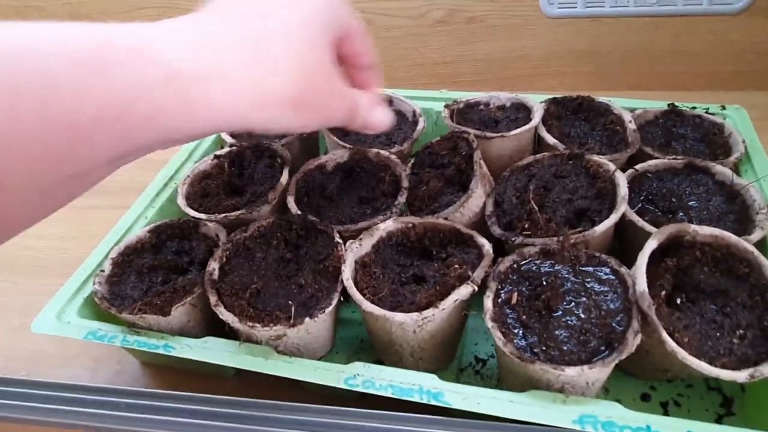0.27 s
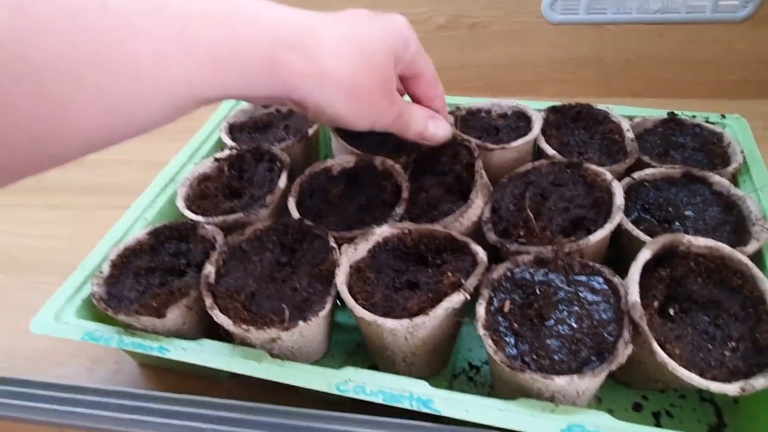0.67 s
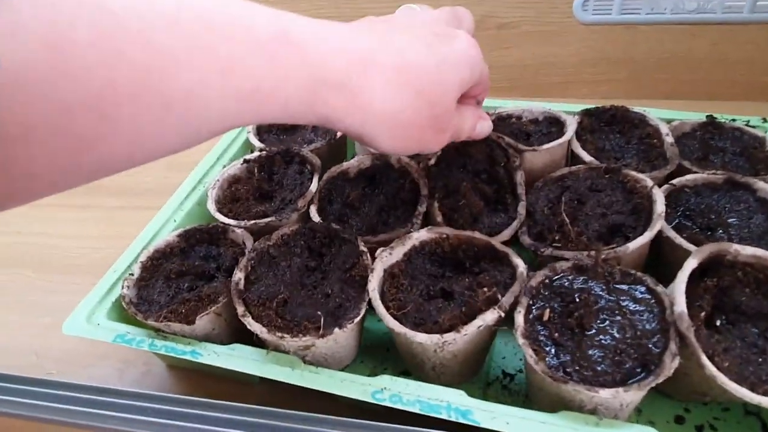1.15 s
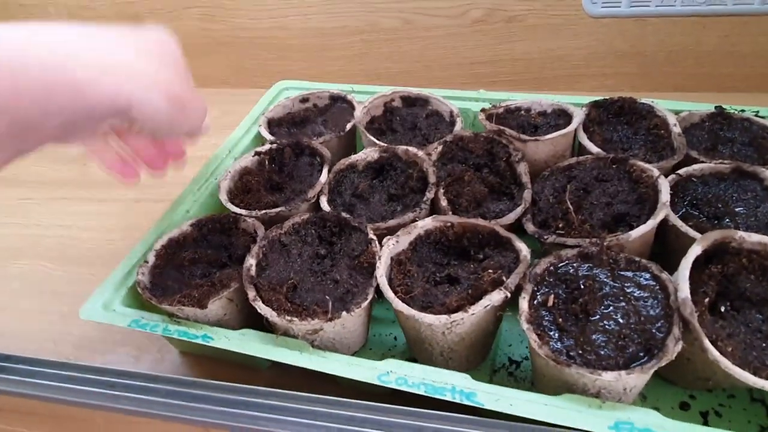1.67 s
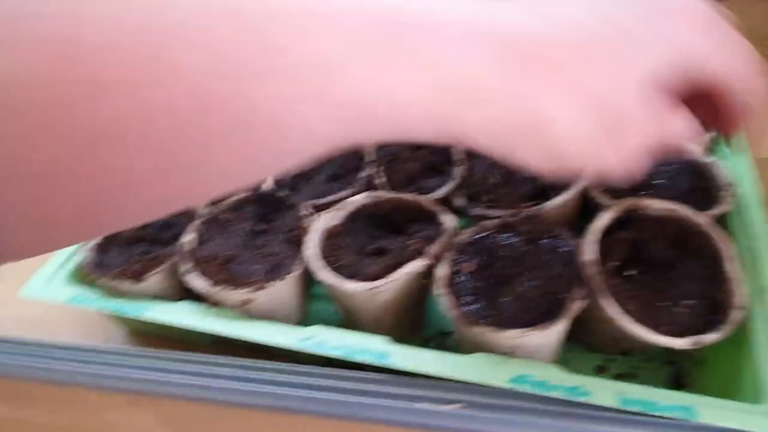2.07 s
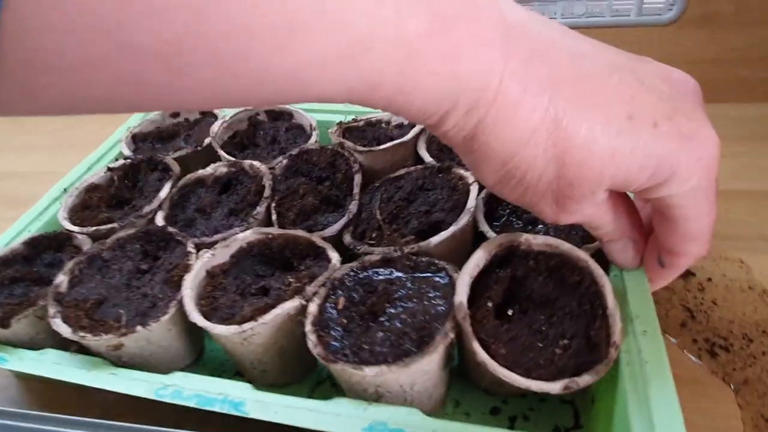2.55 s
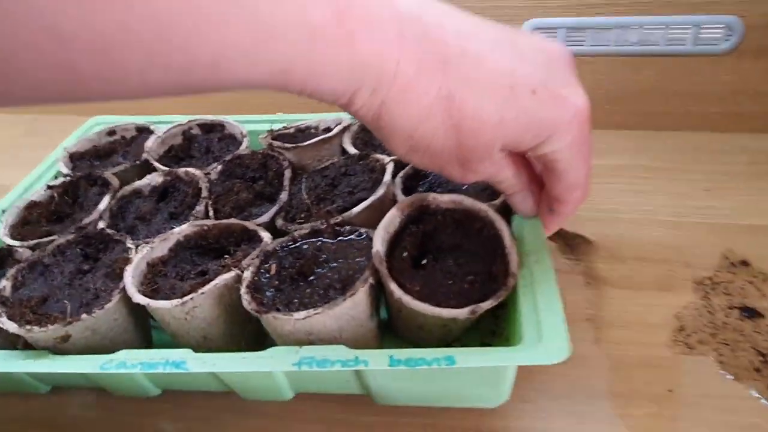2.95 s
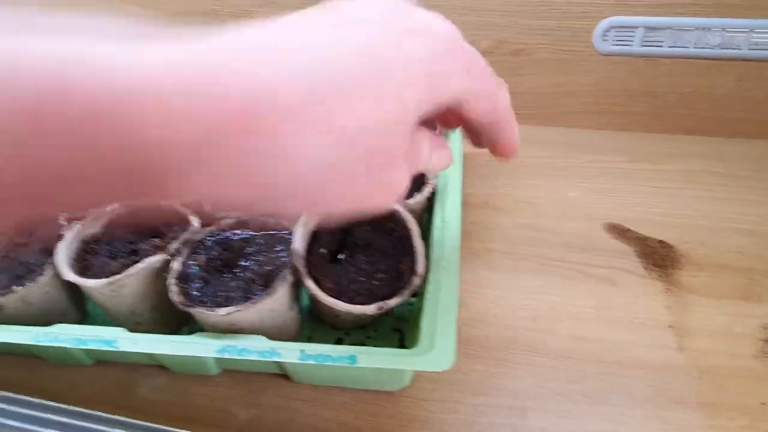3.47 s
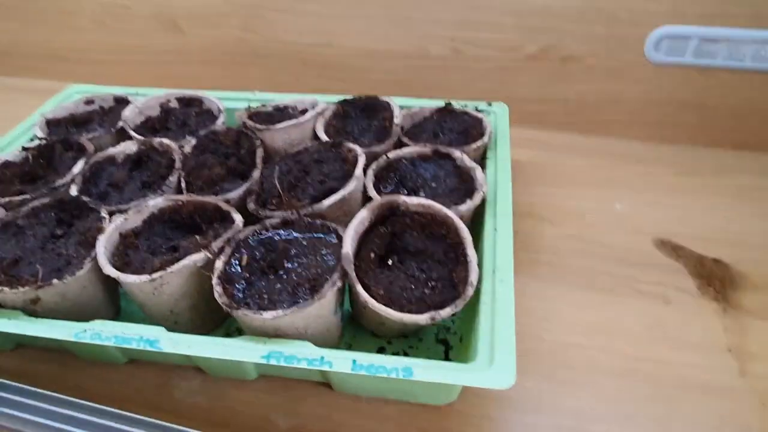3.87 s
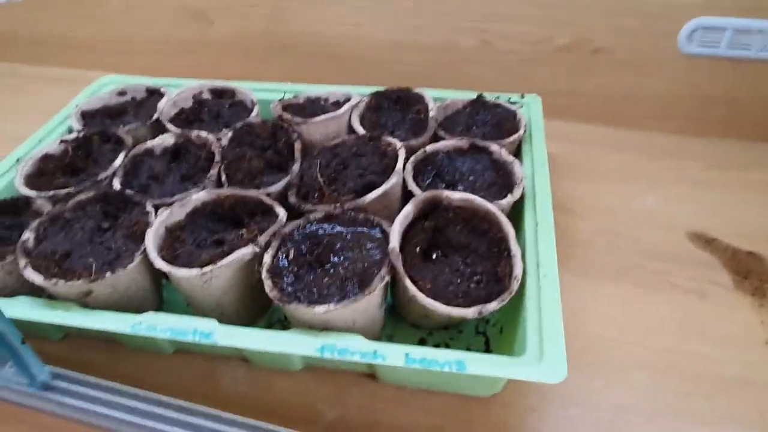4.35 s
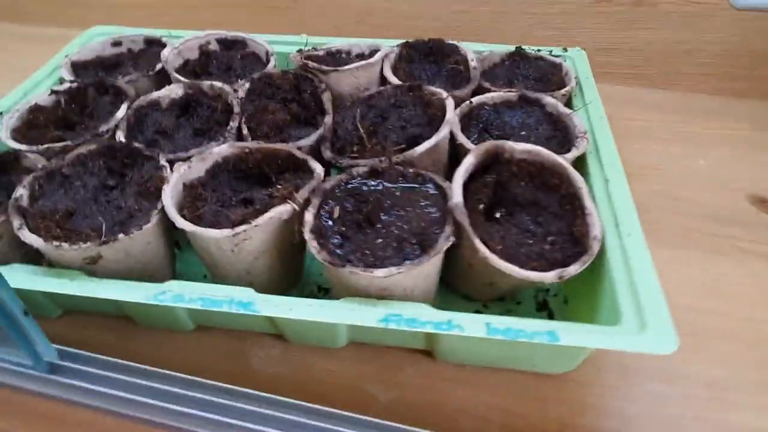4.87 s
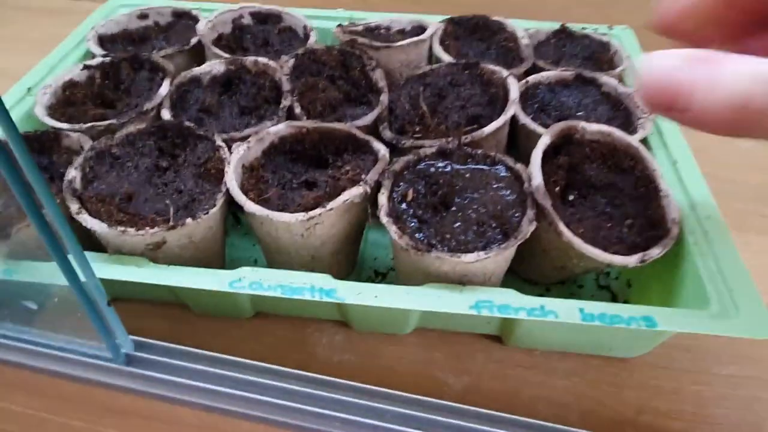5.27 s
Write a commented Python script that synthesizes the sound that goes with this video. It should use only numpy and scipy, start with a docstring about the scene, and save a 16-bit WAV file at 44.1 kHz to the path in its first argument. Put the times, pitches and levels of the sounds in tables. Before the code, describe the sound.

Quiet room with faint rumble and hum, recorded close in stereo. Irregular moist crunches come first, then two dull nudges on a tray, a creak and a rough gritty plastic-on-wood drag that strengthens and ends in a cluster of woody thumps. A calm gap follows, then muffled finger knocks and rubbing on the recorder at right, with distant bird chirps.

```python
"""Soft wet crunches over a faint room hum: a hand presses compost into paper pots. Then the plastic
seed tray is dragged over a gritty wooden shelf until it bumps to a stop. Fingers rub and knock the
hand-held recorder by its right port; its casing ticks; a sparrow chirps outside.
Contacts are random grains through stereo spectra; panels, board, pots and casing are ringing modes;
birds are gliding sines with echoes; the room is filtered noise and wavering hum lines."""
import sys
import numpy as np
from scipy import signal
from scipy.fft import rfft, irfft, next_fast_len
from scipy.io import wavfile

SR = 44100
rng = np.random.default_rng(int(sys.argv[2]) if len(sys.argv) > 2 else 0)


def transcribe(u):
    """Save the signal u as a 16-bit wav file named by the first command-line argument.

    u: samples, shape (n,) or (channels, n), limited to [-1, 1]; the rate is SR.
    q: integer samples, one column per channel.
    """
    v = np.clip(np.atleast_2d(u).T, -1, 1)
    q = np.round(v * 32767).astype(np.int16)
    wavfile.write(sys.argv[1], SR, q)


N = 242934
FFT = next_fast_len(N)
TIME = np.arange(N) / SR
HZ = np.maximum(np.fft.rfftfreq(FFT, 1 / SR), 1)

# Stereo: (frequency [Hz], left-right likeness)
LIKENESS = [(60, 0.76), (250, 0.66), (2000, 0.33), (5000, 0.051)]
# (frequency [Hz], left's phase lead [rad])
PHASE_LEAD = [(150, .2), (1500, 1.7)]
# Balance of rubbed contacts: (frequency [Hz], left-right [dB])
PORT_BALANCE = [(800, -1.5), (9000, -3.5), (14000, -16.5)]

# Relative spectra: (frequency [Hz], density [dB per Hz])
# room air
ROOM_SPECTRUM = [(40, -3.5), (75, 0.5), (125, -9), (230, -17), (341, -6.5), (420, -13), (970, -26.5),
                 (3230, -34), (7650, -46), (10200, -38), (15500, -43)]
# rub of skin on the casing
RUB_SPECTRUM = [(240, -14), (400, 9), (871, 1), (2010, -3.5), (4180, -13.5), (7000, -37), (9100, -83)]
# handling rumble
HANDLING_SPECTRUM = [(70, 2.5), (200, -6.5), (450, -21), (900, -74)]
# treble of fingers and skin
SOFT_GRIT_SPECTRUM = [(6500, -51), (8300, -2.5), (9800, 6.5), (11500, -1.5), (15500, -24)]
# body of the compost crunch
RUSTLE_SPECTRUM = [(290, -32), (500, -1.5), (804, -11.5), (1250, -2.5), (1440, -9), (2900, -15),
                   (7000, -34), (9100, -88)]
# body of the scrape
SCRAPE_SPECTRUM = [(820, -32), (1400, -4.5), (3140, -4.5), (7000, -17.5), (9100, -47)]
# treble of the scrape
GRIT_SPECTRUM = [(4710, -47.5), (8000, -15.5), (8360, -2), (9870, 4.5), (11500, -0.5), (15500, -13.5)]
# load of wet pots pressing on the wood
WEIGHT_SPECTRUM = [(150, -33), (250, -8.5), (423, -8.5), (598, 2), (804, -7), (949, 2), (1400, -8.5),
                   (1820, -34.5), (3080, -120)]

# Distant rumble and deep drone: (time [s], rumble level [dB], drone level [dB])
SWELL = [(0, -67, -85), (.42, -71.5, -77), (.52, -68.5, -71), (1.15, -62.5, -68), (2.0, -63, -64.5),
         (5.51, -64, -69)]
# Hum lines: (frequency [Hz], level [dB])
HUM = [(102.3, -71), (150.7, -81.5), (349.9, -83.5), (549.1, -85.5)]

# One call: two-voiced pip, faint slide, loud note, falling end; times before stretching
# (time after start [s], length [s], from [Hz], to [Hz], relative level [dB])
CHIRP_NOTES = [(.003, .022, 4520, 4400, 0), (.003, .024, 4120, 3980, 1), (.014, .03, 3650, 2900, -5),
               (.04, .04, 3600, 3150, 8), (.052, .028, 3200, 2800, 1)]
# Calls: (start [s], level [dB], time stretch [ratio])
CHIRPS = [(1.434, -64.5, 0.97), (3.83, -65, 0.91), (4.872, -59, 0.77)]
# Far song, and the faint first note of the second chirp:
# (start [s], length [s], from [Hz], to [Hz], level [dB])
FAINT_NOTES = [(3.806, .025, 4950, 4520, -80), (4.93, 0.25, 4450, 4290, -74.5), (5.0, .33, 3555, 3310, -80)]

# Casing ticks: (time [s], peak [dB], left-right [dB], tilt [dB per octave])
TICKS = [(3.9896, -41, 10.5, -6), (4.784, -42, -14, -15)]
# Casing modes: (frequency [Hz], relative level [dB], t60 [s])
CASING_MODES = [(583, 4, 0.012), (1090, -13, 0.027), (2220, 16.5, 0.0014), (3200, 3.5, 0.022)]
# Finger knocks by the right port: (time [s], push level [dB], contact scale [ms], scuff level [dB])
KNOCKS = [(4.327, -24, 3.06, -61), (4.376, -24, 2.84, -64.5), (4.456, -24, 2.68, -64.5),
          (4.537, -22.5, 2.45, -54), (4.58, -41, 2.3, -59.5), (4.712, -27.5, 4.5, -71),
          (4.805, -26.5, 4.1, -81), (4.855, -34.5, 2.74, -76)]
# Hand strokes on the recorder: (start [s], length [s], rub level [dB], brightness [dB],
# rumble level [dB], left-right [dB] of the rub)
STROKES = [(3.973, 0.29, -68, -23.5, -55, 4.5), (4.07, 0.021, -86, 7, -70, 0),
           (4.276, 0.33, -82, -10.5, -56, -6), (4.388, 0.34, -70, -8.5, -55.5, 2),
           (4.545, 0.58, -62, -28.5, -54, -5), (4.957, 0.073, -62, -21.5, -68, -21.5)]
# Skin dragged across the right port: (start [s], length [s], frequency [Hz], level [dB])
RASPS = [(4.1, .07, 2000, -75), (4.66, .12, 2150, -75), (4.976, .044, 1500, -56)]

# Board modes: (frequency [Hz], relative level [dB], unloaded t60 [s])
SHELF_MODES = [(82.5, 0, 0.015), (101.2, -3.5, 0.31), (148, -3.5, 0.15), (206.3, 2.5, 0.11),
               (329, -8, 0.147)]
SHELF_LEAN_DB = [-11.0, 1.5, -2.5, -1.5, -13.5]  # left-right, one per board mode
# Shelf jolts: (time [s], rumble level [dB])
JOLTS = [(1.88, -51), (2.279, -45), (3.031, -40.5)]
# Tray bumps: (time [s], strike level [dB], contact [ms])
BUMPS = [(1.837, -38.5, 7.1), (1.904, -34, 6.4), (2.299, -37.5, 1.5), (2.426, -38.5, 7.3),
         (3.481, -26, 2.23), (3.4852, -23.5, 5.87), (3.4969, -23, 3.36), (3.522, -31, 3.43)]

# Presses into compost and on the tray rim:
# (start [s], start to decay [s], level before offset [dB], brightness [dB], hollow pitch [Hz])
PRESSES = [(0.085, 0.06, -57.5, -7.5, 1600), (0.208, 0.018, -61.5, 0, 1190),
           (0.27, 0.0086, -73.5, -21, 2500), (0.485, 0.047, -64, -15, 1190), (0.578, 0.058, -58, -15, 1050),
           (0.648, 0.02, -53.5, -12, 1190), (0.85, .01, -63, 1, 1860), (0.967, 0.11, -61.5, -7, 1236),
           (1.108, 0.033, -57, -6.5, 985), (1.255, 0.062, -59.5, -8.5, 1200),
           (1.365, 0.077, -65.5, -10.5, 1120), (1.826, 0.026, -51, -16.5, 860),
           (1.874, 0.022, -49.5, -12.5, 1000)]
# Pot modes: (multiple of the hollow pitch)
POT_MODES = [1, 1.56, 2.4]

# Tray creeps, slides, stops: (time [s], scrape level [dB], brightness [dB])
DRAG = [(2.34, -70.5, -4), (2.506, -68.5, 0.5), (2.57, -53.5, -3.5), (2.638, -49.5, -1.5),
        (2.874, -45, 3.5), (3.005, -42, 2.5), (3.07, -37.5, -1), (3.19, -41, -4), (3.284, -40.5, -1),
        (3.394, -38, -2), (3.45, -43.5, -4.5), (3.48, -39.5, -4.5), (3.51, -58.5, -5.5)]
# Tray panel modes: (frequency [Hz])
TRAY_MODES_HZ = [612, 681, 944, 1038, 1140, 1315, 1395, 1633, 1920, 2220, 3120]
# An edge catches and one panel sings: (start [s], frequency [Hz], level [dB])
CATCHES = [(2.78, 990, -52.5), (3.061, 643, -44), (3.33, 950, -46), (3.345, 1323, -41)]

ROOM_DB, DRONE_HZ = -68, 34.4
WARBLE_HZ, GARDEN_T60_S, BIRD_PAN_DB = 115, 0.27, -4
CASE_HZ, KNOCK_LEFT_DB = 67, -28  # the port leaks pressure below CASE_HZ
RASP_T60_S = 0.005
SHAKE_DB, SHAKE_FOLLOWS = -51, 0.37  # rumble under the slide; share of the scrape's swing
JOLT_RISE_MS, JOLT_T60_S = 2.6, 0.187
PRESS_OFFSET_DB = 9.5  # subtracted from the press levels
PRESS_RISE_MS, PRESS_T60_S = 32, 0.2
HOLLOW_DB, HOLLOW_T60_S = -5, 0.023
SEIZE_S, SEIZE_HOLD_S, SEIZE_DB, SEIZE_BRIGHT_DB = 2.262, 0.025, -53, -8
STOP_S, STOP_T60_S = 3.485, 0.16  # shelf stops shaking; last of the scrape dies away
SLIDE_DB = -47  # reference scrape level
WEIGHT_DB, WEIGHT_PER_BRIGHT, WEIGHT_PER_LEVEL = -4, -0.65, -0.31
TRAY_DB, TRAY_T60_S, TRAY_FLARE_DB = -5, 0.11, 6
CATCH_S, CATCH_T60_S = 0.075, 0.05
CUTOFF_HZ = 15480


def amp(db):
    """dB to gain."""
    return 10 ** (np.asarray(db) / 20)


def rms_one(x):
    """Scale to rms 1."""
    return x / np.sqrt(np.mean(x ** 2) + 1e-20)


def in_time(rows):
    """Interpolate a table's columns at every sample, holding the ends."""
    times_s, *columns = np.transpose(rows)
    return [np.interp(TIME, times_s, column) for column in columns]


def at_hz(points):
    """Interpolate a table at every FFT bin, on a log frequency axis."""
    hz, value = np.transpose(points)
    return np.interp(np.log(HZ), np.log(hz), value)


def pan(left_right_db):
    """Channel gains for a left-right difference."""
    return amp(np.multiply.outer([0.5, -0.5], left_right_db))


def drift(rate_hz):
    """Slow random wander with rms 1: twice low-passed noise."""
    r = np.exp(-2 * np.pi * rate_hz / SR)
    wander = signal.lfilter([1], [1, -2 * r, r * r], rng.standard_normal(N + SR))
    return rms_one(wander[SR:])  # skip the settling


def coloured(inputs, spectrum, balance_db=0):
    """Two unrelated inputs to a coloured stereo pair, alike in the bass; mid rms 1."""
    mid, side = rfft(inputs, FFT)
    alike = np.clip(at_hz(LIKENESS), 0, 1)
    sign = np.array([[1], [-1]])
    pair = np.sqrt(1 + alike) * mid + np.sqrt(1 - alike) * side * sign
    pair = pair * np.exp(0.5j * at_hz(PHASE_LEAD) * sign)
    pair = pair * amp(at_hz(spectrum)) * pan(balance_db + 0 * HZ)
    out = irfft(pair, FFT)[:, :N]
    return out / np.std(out.mean(axis=0))


def grains(per_s, spread_db):
    """Two unrelated streams of random contacts of uneven size and sign."""
    sizes = amp(spread_db * np.minimum(rng.exponential(1, (2, N)), 5))
    signs = rng.choice([-1, 1], (2, N))
    return sizes * signs * (rng.random((2, N)) < per_s / SR)


def rubbing(bands, per_s, spread_db, flicker_db):
    """Dragged grains: the same contacts heard in several (gain, spectrum) bands."""
    contacts = grains(per_s, spread_db) * amp(flicker_db * drift(11.2))
    balance_db = at_hz(PORT_BALANCE)
    return sum(gain * coloured(contacts, spectrum, balance_db) for gain, spectrum in bands)


def ring(force, hz, t60_s):
    """Damped resonance: a unit click rings a sine of initial height 1."""
    r, w = amp(-60 / (t60_s * SR)), 2 * np.pi * hz / SR
    return signal.lfilter([0, np.sin(w)], [1, -2 * r * np.cos(w), r * r], force + 1e-18)


def push(start_s, length_ms):
    """Smooth contact force of height 1."""
    done = np.clip((TIME - start_s) / (length_ms / 1000), 0, 1)
    return np.sin(np.pi * done) ** 2


def burst(start_s, rise_ms, t60_s):
    """Envelope that rises to 1 and dies away."""
    age_s, rise_s = np.maximum(TIME - start_s, 0), rise_ms / 1000
    return np.minimum(age_s / rise_s, 1) * amp(-60 * np.maximum(age_s - rise_s, 0) / t60_s)


def stroke(start_s, length_s):
    """Movement that swells and ebbs, height 1."""
    return np.sin(np.pi * np.clip((TIME - start_s) / length_s, 0, 1))


def room():
    """Slowly swelling rumble over steady hiss, with hum lines wavering in level and phase."""
    air = coloured(rng.standard_normal((2, N)), ROOM_SPECTRUM)
    rumble = signal.sosfilt(signal.butter(2, 700, fs=SR, output="sos"), air)
    hiss = air - rumble
    rumble_db, drone_db = in_time(SWELL)
    hum = 0
    for hz, db in HUM + [(DRONE_HZ, drone_db)]:
        level = amp(db + 0.58 * drift(10)) * np.sqrt(2)
        hum = hum + level * np.sin(2 * np.pi * hz * TIME + 0.71 * drift(6.6))
    return amp(rumble_db + 2.7 * drift(5.0)) * rumble + amp(ROOM_DB) * hiss + hum


def whistle(notes, warble_hz):
    """Each note is a sine gliding between two pitches, its frequency shaken at random."""
    out, warble = np.zeros(N), warble_hz * drift(330)
    for start_s, length_s, from_hz, to_hz, db in notes:
        on = slice(int(start_s * SR), int((start_s + length_s) * SR))
        done = (TIME[on] - TIME[on][0]) / length_s
        hz = from_hz + (to_hz - from_hz) * done + warble[on]
        envelope = amp(db) * np.sqrt(np.sin(np.pi * done))
        out[on] += envelope * np.sin(2 * np.pi * np.cumsum(hz) / SR)
    return out


def birds():
    """Chirps and faint notes, smeared by a decaying noise tail: echoes of walls and glass."""
    calls = whistle(FAINT_NOTES, 2 * WARBLE_HZ)
    for start_s, db, stretch in CHIRPS:
        notes = [(start_s + stretch * t, stretch * length_s, *note)
                 for t, length_s, *note in CHIRP_NOTES]
        calls += amp(db) * whistle(notes, WARBLE_HZ)
    tail_s = TIME[:SR // 2]
    echoes = rng.standard_normal((2, len(tail_s))) * amp(-60 * tail_s / GARDEN_T60_S)
    echoes /= np.sqrt(np.sum(echoes ** 2, axis=1, keepdims=True))
    echoes[:, 0] += 0.12  # direct path
    return signal.fftconvolve(calls[None], echoes, axes=1)[:, :N] * pan([BIRD_PAN_DB])


def ticks():
    """Sharp clicks ring the casing's short modes."""
    out = np.zeros((2, N))
    for start_s, db, pan_db, tilt_db in TICKS:
        click = -push(start_s, 0.32) / 5
        modes = sum(amp(mode_db + tilt_db * np.log2(hz / 1000)) * ring(click, hz, t60_s)
                    for hz, mode_db, t60_s in CASING_MODES)
        out += amp(db) * modes / np.abs(modes).max() * pan([pan_db])
    return out


def knocks():
    """Short suction, then a push on the port; the pressure leaks away and the skin scuffs."""
    force, scuff_level = 0, 0
    for start_s, db, ms, scuff_db in KNOCKS:
        suction = 0.53 * push(start_s - ms / 4000, ms)
        force = force + amp(db) * (push(start_s + ms / 2000, 1.297 * ms) - suction)
        scuff_level = scuff_level + amp(scuff_db) * burst(start_s, 3.6, 0.11)
    leak = signal.bilinear([1, 0], [1, 2 * np.pi * CASE_HZ], SR)  # one-pole high-pass
    thud = signal.lfilter(*leak, force + 1e-18)
    scuff = scuff_level * coloured(rng.standard_normal((2, N)), RUB_SPECTRUM)
    return thud * amp([[KNOCK_LEFT_DB], [0]]) + scuff * pan([-10])


def grip():
    """Skin rubs the casing; unrelated rumble reaches each port, mostly the right; slips rasp."""
    body, treble, low = 0, 0, 0
    for start_s, length_s, db, bright_db, rumble_db, pan_db in STROKES:
        shape = stroke(start_s, length_s)
        body = body + amp(db) * shape ** 2 * pan([pan_db])
        treble = treble + amp(db + bright_db) * shape ** 2 * pan([pan_db])
        low = low + amp(rumble_db) * shape
    bands = [(body, RUB_SPECTRUM), (treble, SOFT_GRIT_SPECTRUM)]
    rub = rubbing(bands, per_s=1500, spread_db=2.0, flicker_db=1.5)
    noise = rfft(rng.standard_normal((2, FFT)))
    rumble = rms_one(irfft(noise * amp(at_hz(HANDLING_SPECTRUM)), FFT)[:, :N])
    rumble = low * amp(1.5 * drift(22.0)) * rumble
    slips = grains(1500, 1.6)[0]
    rasp = 0
    for start_s, length_s, hz, db in RASPS:
        rung = ring(ring(slips, hz, RASP_T60_S), hz, RASP_T60_S / 5)
        rasp = rasp + amp(db) * np.sqrt(np.abs(stroke(start_s, length_s))) * rms_one(rung)
    return rub + rumble * pan([-9]) + rasp * pan([-20])


def slide():
    """Scrape level [dB], brightness [dB] and onset gate: rim seized, tray dragged, stopped."""
    db, bright_db = in_time(DRAG)
    db = db - 60 * np.maximum(TIME - DRAG[-1][0], 0) / STOP_T60_S
    held_until_s = SEIZE_S + SEIZE_HOLD_S
    to_drag = np.clip((TIME - held_until_s) / (DRAG[0][0] - held_until_s), 0, 1)
    db = SEIZE_DB + to_drag * (db - SEIZE_DB)
    bright_db = np.where(TIME < held_until_s, SEIZE_BRIGHT_DB, bright_db)
    return db, bright_db, np.clip((TIME - SEIZE_S) / 0.013, 0, 1)


def shelf():
    """The board's low modes, shaken at random by slide and jolts and struck by the bumps."""
    db, _, on = slide()
    level = on * (TIME < STOP_S) * amp(SHAKE_DB + SHAKE_FOLLOWS * (db - SLIDE_DB))
    level = level + sum(amp(jolt_db) * burst(start_s, JOLT_RISE_MS, JOLT_T60_S)
                        for start_s, jolt_db in JOLTS)
    shaking = 0
    for hz, mode_db, t60_s in SHELF_MODES:
        noise = rng.standard_normal(N) + 0.69 * rng.standard_normal((2, N))
        shaking = shaking + amp(mode_db) * ring(noise, hz, t60_s / 3.5)  # damped by the moving load
    force = sum(amp(bump_db) * push(start_s, ms) / (ms * SR / 2000) for start_s, bump_db, ms in BUMPS)
    # high-pass: keeps the bumps free of deep bass
    force = signal.sosfilt(signal.butter(4, 55, "high", fs=SR, output="sos"), force)
    struck = sum(amp(mode_db) * pan([lean_db]) * ring(force, hz, t60_s)
                 for (hz, mode_db, t60_s), lean_db in zip(SHELF_MODES, SHELF_LEAN_DB))
    return level * rms_one(shaking) + struck


def fingers():
    """Wet compost crunches while pressed, then settles; the pressed pot rings hollow."""
    body, treble, hollow = 0, 0, np.zeros((2, N))
    crumbs = grains(400, 5.2)
    for start_s, held_s, db, bright_db, hz in PRESSES:
        age_s = TIME - start_s
        rise = np.clip(age_s / PRESS_RISE_MS * 1000, 0, 1)
        decay = amp(-60 * (age_s - held_s) / PRESS_T60_S)
        shape = amp(db - PRESS_OFFSET_DB) * np.minimum(rise, decay)
        body, treble = body + shape, treble + amp(bright_db) * shape
        on = slice(int(start_s * SR), int((start_s + 0.5) * SR))
        modes = sum(ring(crumbs[:, on], m * hz, HOLLOW_T60_S) / m for m in POT_MODES)
        hollow[:, on] += shape[on] * rms_one(modes)
    bands = [(body, RUSTLE_SPECTRUM), (treble, SOFT_GRIT_SPECTRUM)]
    crunch = rubbing(bands, per_s=1800, spread_db=-0.5, flicker_db=3.0)
    return crunch + amp(HOLLOW_DB) * hollow


def panels():
    """Noise-driven tray modes, each flaring on its own as the load shifts; rms 1."""
    modes = 0
    for hz in TRAY_MODES_HZ:
        flare = amp(TRAY_FLARE_DB * drift(17.0)) * pan([rng.normal(-2.2, 3.5)])
        modes = modes + flare * ring(rng.standard_normal(N), hz, TRAY_T60_S)
    return rms_one(modes)


def tray():
    """The tray grinds loose soil on wood, its panels ring, and caught edges sing."""
    db, bright_db, on = slide()
    # a quieter, duller scrape is heavier
    weight_db = WEIGHT_DB + WEIGHT_PER_BRIGHT * bright_db + WEIGHT_PER_LEVEL * (db - SLIDE_DB)
    bands = [(1, SCRAPE_SPECTRUM), (amp(bright_db), GRIT_SPECTRUM), (amp(weight_db), WEIGHT_SPECTRUM)]
    grind = rubbing(bands, per_s=11000, spread_db=1.5, flicker_db=1.5)
    catches = 0
    for start_s, hz, catch_db in CATCHES:
        song = rms_one(ring(rng.standard_normal(N), hz, CATCH_T60_S))
        catches = catches + amp(catch_db) * stroke(start_s, CATCH_S) * song
    return on * amp(db) * (grind + amp(TRAY_DB + weight_db) * panels()) + catches


def scene():
    """All sources at the two ports."""
    return room() + birds() + ticks() + knocks() + grip() + shelf() + fingers() + tray()


def record(dry):
    """The microphone loses the deepest bass; the top is cut steeply."""
    wet = signal.sosfilt(signal.butter(4, 30, "high", fs=SR, output="sos"), dry)
    return signal.sosfilt(signal.ellip(14, 0.5, 85, CUTOFF_HZ, fs=SR, output="sos"), wet)


dry = scene()
out = record(dry)
transcribe(out)
```